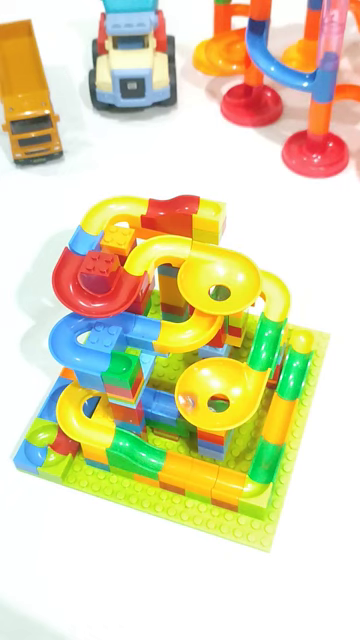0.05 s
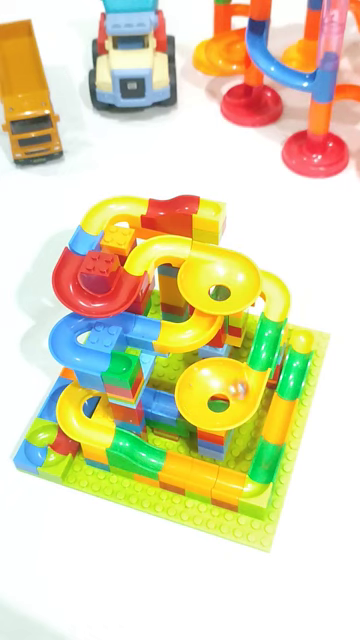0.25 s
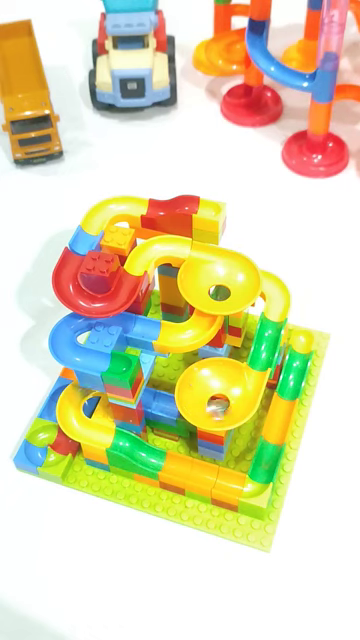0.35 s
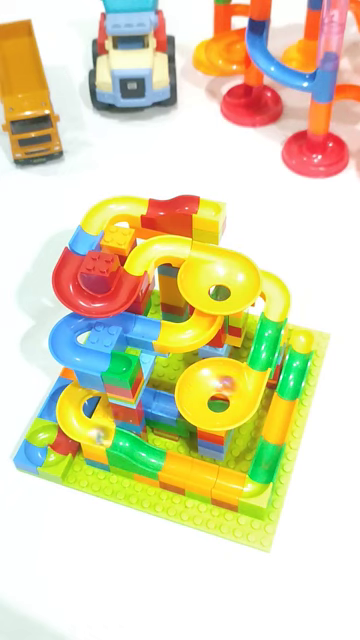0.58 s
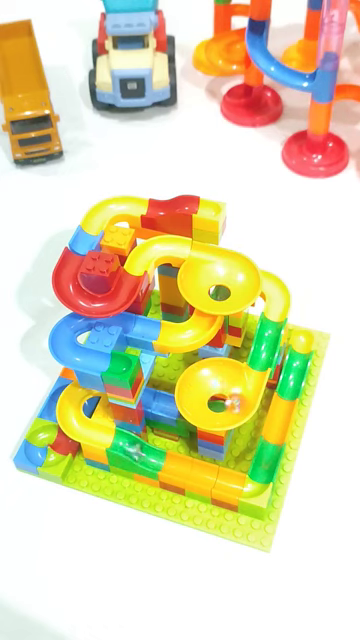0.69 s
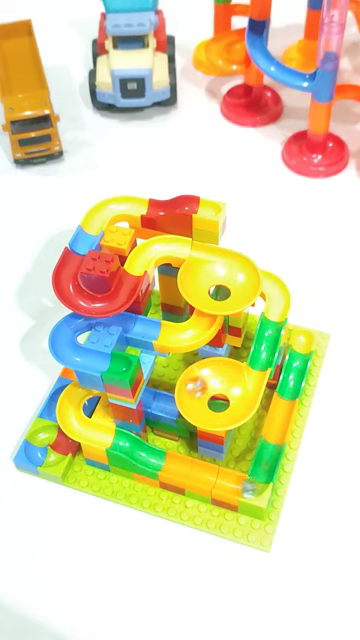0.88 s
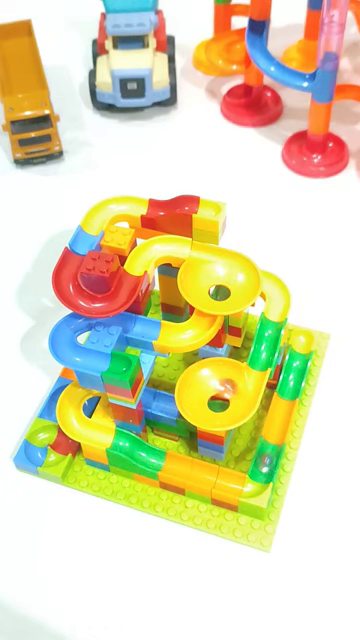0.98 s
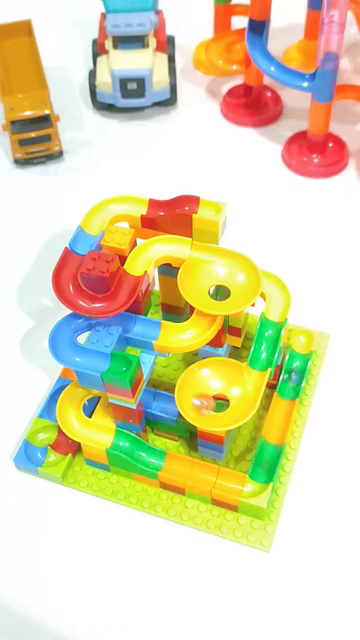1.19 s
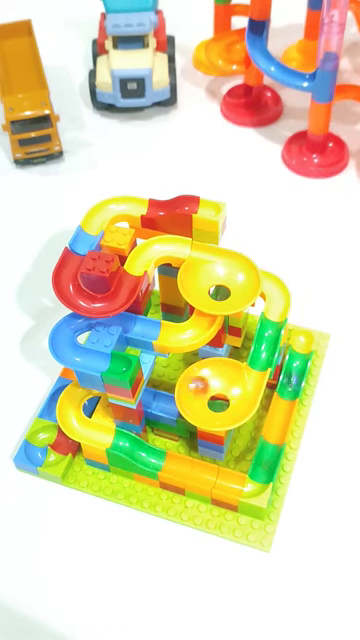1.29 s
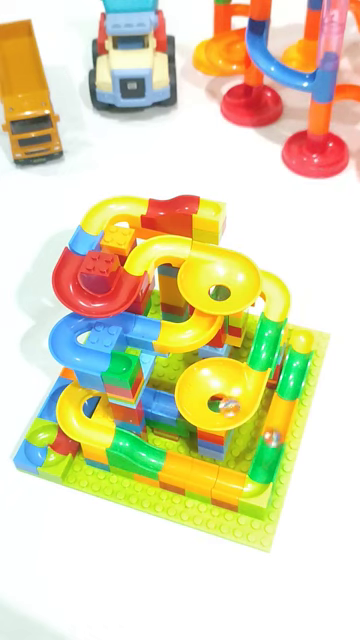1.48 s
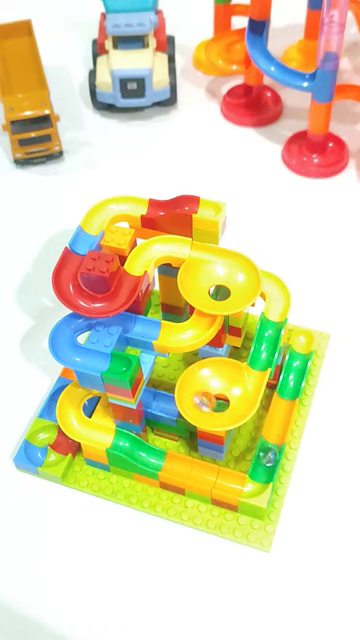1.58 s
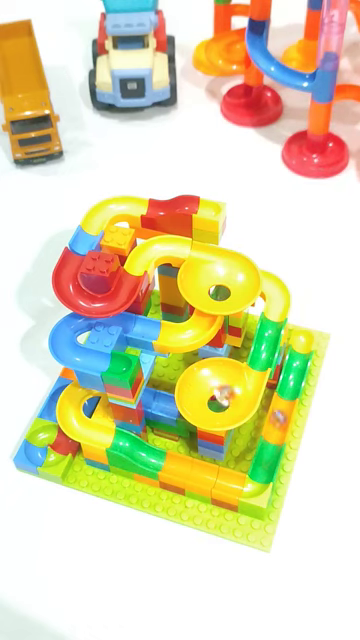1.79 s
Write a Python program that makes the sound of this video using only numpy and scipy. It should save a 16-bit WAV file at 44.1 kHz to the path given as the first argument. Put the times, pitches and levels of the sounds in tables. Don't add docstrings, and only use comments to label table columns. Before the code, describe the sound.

Marbles rattling through a hollow plastic marble run, with hard knocks, glassy clicks and rolling rumble

```python
import sys
import numpy as np
from scipy import signal
from scipy.fft import rfft, irfft
from scipy.io import wavfile

SR = 44100
rng = np.random.default_rng(int(sys.argv[2]) if len(sys.argv) > 2 else 0)


def convert_level_to_amplitude(level_db):
    exponent = np.asarray(level_db, float) / 20
    return 10 ** exponent


def file_out(sig):
    cols = np.atleast_2d(sig).T
    lim = np.clip(cols, -1, 1)
    pcm = np.round(lim * 32767).astype(np.int16)
    wavfile.write(sys.argv[1], SR, pcm)


N = 79380

# frequency in Hz, level in dB, t60 in seconds.
TRACK_MODES = [(866, -0.5, 0.043), (1106, -9.5, 0.14), (1200, 3.5, 0.024), (1509, -10, 0.076),
               (1600, 4.5, 0.017), (1916, -1, 0.013), (2230, -7, 0.087), (2544, 0, 0.061), (2997, 5, 0.018),
               (3130, 9, 0.0072), (3684, -3, 0.067), (4000, 2, 0.011), (4800, -60, 0.09)]


def at_hz(points, hz):
    point_hz, value = np.transpose(points)
    return np.interp(np.log(hz), np.log(point_hz), value)


def rms_one(x):
    return x / np.sqrt(np.mean(x ** 2) + 1e-20)


def pair(alike, size):
    mid, side = rng.standard_normal((2, size))
    alike = np.clip(alike, 0, 1)
    return np.sqrt(1 + alike) * mid + np.sqrt(1 - alike) * side * [[1], [-1]]


def butter(order, hz, kind, x):
    return signal.sosfilt(signal.butter(order, hz, kind, fs=SR, output="sos"), x)


def hum():
    # frequency in Hz, level in dB per Hz.
    hum_spectrum = [(8.8, 8.5), (40, 6), (164, -7.5), (405, -19), (2470, -20), (7070, -35.5), (9190, -29.5),
                    (12300, -83), (16000, -109)]
    hum_db, hum_alike, left_right_db = -60, 2 / 3, -2
    drone_hz, drone_db, drone_ends_s = 159.7, -68, 0.29
    hz = np.maximum(np.fft.rfftfreq(N, 1 / SR), 1)
    t = np.arange(N) / SR
    drone = convert_level_to_amplitude(drone_db - 20 * (t / drone_ends_s) ** 4) * np.sin(2 * np.pi * drone_hz * t)
    spectrum = rfft(pair(hum_alike, N)) * convert_level_to_amplitude(at_hz(hum_spectrum, hz))
    rumble = convert_level_to_amplitude(hum_db) * rms_one(irfft(spectrum, N))
    return (rumble + drone) * convert_level_to_amplitude(left_right_db * np.array([[.5], [-.5]]))


def ring(impulses, hz, t60):
    r, w = convert_level_to_amplitude(-60 / (t60 * SR)), 2 * np.pi * hz / SR
    return signal.lfilter([0, np.sin(w)], [1, -2 * r * np.cos(w), r * r], impulses + 1e-18)


def rolling():
    # time in seconds, level in dB, pitch of the piece under the marble in Hz.
    roll_path = [(0.0, -46, 1720), (0.084, -69.5, 1280), (0.224, -52.5, 1150), (0.264, -52.5, 1750),
                 (0.334, -51, 1170), (0.386, -57, 1660), (0.44, -64, 1720), (0.47, -58, 1210),
                 (0.67, -58.5, 1310), (0.802, -55, 2010), (0.852, -61.5, 1810), (1.022, -47, 2400),
                 (1.056, -51, 1460), (1.132, -58, 2060), (1.182, -52, 1470), (1.418, -66, 1670),
                 (1.658, -59, 1340), (1.8, -71, 1360)]
    grains_per_s, grain_db, near_db_per_oct = 2500, 2.5, 9.5
    grit_db, grit_above_hz, grit_alike = -15, 5000, 0.1
    swell_db, swells_per_s = 6, 42.4

    t = np.arange(N) / SR
    s, db, pitch_hz = np.transpose(roll_path)
    under_hz = np.interp(t, s, pitch_hz)
    sizes = convert_level_to_amplitude(grain_db * np.minimum(rng.exponential(1, N), 4)) * rng.choice([-1, 1], N)
    grains = sizes * (rng.random(N) < grains_per_s / SR)
    body = 0
    for hz, mode_db, t60 in TRACK_MODES:
        dealt = rng.random(N) < .4
        nearness = convert_level_to_amplitude(-near_db_per_oct * abs(np.log2(hz / under_hz)))
        body = body + convert_level_to_amplitude(mode_db) * ring(grains * dealt * nearness, hz, min(0.5 * t60 + 0.0043, .04))
    grit = butter(2, grit_above_hz, "high", grains * pair(grit_alike, N))
    swell = rms_one(butter(2, swells_per_s, "low", rng.standard_normal(N)))
    level = convert_level_to_amplitude(np.interp(t, s, db) - 3.0 + swell_db * np.clip(swell, -2, 1))
    return level * (rms_one(body) + convert_level_to_amplitude(grit_db) * rms_one(grit))


def strike(s, db, modes, rebound_s, draws, chatter_db):
    # frequency in Hz, left minus right in dB.
    left_right = [(60, -1.5), (110, -1.5), (200, -1.5), (380, 0.0), (700, -2), (1290, 5.5), (2380, 0.5),
                  (4400, -17), (8120, 8.5), (15000, -16)]
    lag_start_s, lag_end_s = 7e-5, -0.000018
    contact_s, table_s, table_db, detune = .0004, .0029, -12, .05

    out = np.zeros((2, N))
    t = np.arange(s * SR // 1, min(s * SR // 1 + 3500, N))
    hz, level_db, t60 = np.transpose(modes)[:, :, None]
    count = len(hz)
    hz = hz * (1 + detune * draws[0, :count, None])
    lag_s = lag_start_s + (lag_end_s - lag_start_s) * s * SR / N
    touches = [(0, 0), (table_s, table_db)]
    if rebound_s:
        for k in (1, 2, 3):
            touches.append((rebound_s * (k + .5 * draws[0, -k]) / 3, chatter_db - k))
    for ear, side in enumerate((.5, -.5)):
        mode_db = level_db + side * at_hz(left_right, hz)
        for (late_s, touch_db), draw in zip(touches, draws[1:]):
            age = np.maximum(t / SR - s - late_s - side * lag_s, 0)
            weight = draw[:count, None]
            strength = np.sign(weight) * (.5 + abs(weight))
            rings = convert_level_to_amplitude(mode_db - 60 * age / t60) * np.sin(2 * np.pi * hz * age) * strength
            onset = 1 - np.exp(-age / contact_s)
            out[ear, t.astype(int)] += convert_level_to_amplitude(db + touch_db) * onset * rings.sum(axis=0)
    return out


def clicks():
    # time in seconds, peak in dB, share sent into the room in dB, brightness in dB.
    click_events = [(0.001, -45, 12.5, -30), (0.1723, -44.5, -21, -28), (0.2039, -18, 3, -27.5),
                    (0.2414, -31.5, 7.5, -27), (0.3371, -43, 0, -31), (0.387, -44, 11.5, -26),
                    (0.4772, -46, 1, -17), (0.5072, -59, -5, -25), (0.5231, -46.5, 10, -19.5),
                    (0.5295, -44, -37, -21), (0.5626, -50, -10, -17), (0.5863, -40, 4.5, -14.5),
                    (0.6582, -52, -21, -30), (0.6906, -56, -8, -28), (0.7147, -47.5, 9.5, -14.5),
                    (0.7865, -47, -3, -39), (0.7981, -29.5, 9, -12), (0.8978, -26, 7, -17.5),
                    (0.9893, -30.5, 9, -14), (1.0468, -32, 10, -18), (1.0556, -39.5, 5, -28),
                    (1.0595, -34, -26, -20), (1.0654, -32, -21, -26), (1.0981, -27.5, 7, -14.5),
                    (1.2106, -53, 12.5, -40.5), (1.2813, -37.5, 5, -30), (1.3173, -42, 6.5, -35),
                    (1.422, -49.5, 5, -21), (1.444, -41.5, 5.5, -19.5), (1.507, -43.5, 7, -31.5),
                    (1.5373, -49, 3, -21), (1.6277, -57, -11, -31), (1.692, -57.5, 11.5, -27),
                    (1.7527, -61, -6, -15), (1.7635, -54, -16, -21), (1.788, -54.5, 18, -21.5)]
    # frequency in Hz, level in dB, t60 in seconds.
    glass_modes = [(4654, 8, 0.00074), (5990, 7, 0.0058), (6463, 11, 0.0048), (7910, 11.5, 0.0061),
                   (8960, 7.5, 0.004), (10030, 12, 0.0035), (11860, 17, 0.0032), (12800, -19, 0.0014),
                   (13120, 17, 0.0058), (14400, -3, 0.0011)]
    rebound_s, chatter_db = 0.0026, -6
    crack_s, crack_db, click_room_db = 0.0015, 6.5, -5

    draws = rng.uniform(.2, 1, (40, 6, 20)) * (-1) ** np.arange(20)
    draws[:, 0] = rng.uniform(-.5, .5, (40, 20))
    near, far = 0, 0
    for (s, db, room_db, top_db), draw in zip(click_events, draws):
        modes = np.array([(hz, mode_db + (top_db + 6) * np.log2(hz / 7000), min(t60, 1 / 400))
                          for hz, mode_db, t60 in glass_modes])
        near = near + strike(s, db, modes, rebound_s, draw, chatter_db)
        crack = np.column_stack([modes[:, :2], np.minimum(modes[:, 2], crack_s)])
        sent_db = db + room_db + click_room_db + crack_db
        far = far + strike(s, sent_db, crack, 0, draw, 0).mean(axis=0)
    return near, far


def knocks():
    # time in seconds, peak in dB,
    # pitch of the piece in Hz, share of the whole track in dB.
    plastic_knocks = [(0.016, -45.5, 1330, 0), (0.128, -48.5, 1290, 5.5), (0.174, -42, 1136, 9),
                      (0.2111, -24, 1095, -18), (0.256, -29.5, 1442, -14), (0.284, -41, 1044, -13),
                      (0.329, -28.5, 1072, -23), (0.363, -33.5, 1940, -1.5), (0.398, -31, 1790, -3),
                      (0.872, -42, 1620, -14), (0.896, -31.5, 1920, -31), (1.041, -37.5, 1090, -0.5),
                      (1.064, -43, 1386, -7), (1.096, -34, 1830, -24), (1.208, -42, 1200, 2),
                      (1.2815, -25, 1629, -6.5), (1.306, -47, 1510, -12), (1.3193, -28, 1600, -5),
                      (1.342, -45, 1567, -26), (1.445, -45, 1510, 1.5), (1.461, -44.5, 1200, 5.5),
                      (1.509, -43.5, 1702, 11), (1.57, -43.5, 1547, -2), (1.604, -45, 1236, 1),
                      (1.642, -38.5, 1220, 2), (1.688, -49, 1110, -15),
                      (0.2045, -7, 3284, -15), (0.2107, -43, 3250, -8), (0.2408, -11.5, 2895, -12.5),
                   (0.3292, -23.5, 2790, -8), (0.3626, -30.5, 2486, -6), (0.398, -20.5, 3554, -9.5),
                   (0.521, -38, 2970, -10), (0.7246, -43.5, 2690, 3), (0.788, -37, 2237, -5),
                   (0.8759, -36, 1990, 2), (0.8972, -30, 2390, -15), (0.9466, -31, 3900, -4),
                   (0.988, -41, 2310, -15), (1.0201, -28, 2383, -2), (1.0489, -27, 4890, -6),
                   (1.0955, -32.5, 2670, 3.5), (1.2102, -39.5, 2470, 3.5), (1.2804, -26.5, 3500, -5),
                   (1.3183, -23, 3570, -0.5), (1.3454, -36, 2470, -5), (1.5076, -36.5, 3890, 1),
                   (1.641, -44.5, 2940, 5.5),
                      (0.2144, -23, 3070, -15), (0.224, -25, 3280, -26), (0.4465, -49, 1690, -3),
                  (0.4678, -52, 1186, 2), (0.532, -48, 1387, 4.5), (0.6571, -52, 1093, -1.5),
                  (0.677, -45, 1717, -25), (0.858, -42.5, 1840, 0), (1.247, -39.5, 1510, -3),
                  (1.3228, -23, 3770, -14), (1.744, -66, 1144, 3), (1.7844, -58.5, 1380, 7)]
    piece_cycles, piece_db, rebound_cycles = 30, -2.5, 13
    base_db, near_db_per_oct, damping = -9, 5, .6
    low_chatter_db, high_chatter_db = -4.5, -17

    out, draws = 0, rng.uniform(-1, 1, (60, 6, 20))
    draws[:, 0, 0] = 0
    for (s, db, pitch_hz, track_db), draw in zip(plastic_knocks, draws):
        modes = [(pitch_hz, piece_db, piece_cycles / pitch_hz)]
        for hz, mode_db, t60 in TRACK_MODES:
            far_db = near_db_per_oct * abs(np.log2(hz / pitch_hz))
            modes.append((hz, base_db + track_db + mode_db - far_db, damping * t60))
        chatter_db = low_chatter_db if pitch_hz < 2500 else high_chatter_db
        out = out + strike(s, db, modes, rebound_cycles / pitch_hz, draw, chatter_db)
    return out


def room(x):
    # frequency in Hz, t60 in seconds.
    room_t60 = [(300, 0.11), (1200, 0.37), (3500, 0.2), (9000, 0.37), (14000, 0.25)]
    # frequency in Hz, level in dB.
    room_colour = [(300, -7), (1200, 10), (3500, 4), (9000, 2.5), (15000, 6)]
    rise_s, low_alike = .004, .3

    t = np.arange(SR // 2) / SR
    tail = 0
    for low_hz in 150 * 2. ** np.arange(7):
        centre_hz = low_hz * np.sqrt(2)
        noise = pair(low_alike * np.log2(9600 / low_hz) / 2, len(t))
        band = butter(2, [low_hz, 2 * low_hz], "band", noise)
        tail = tail + band * convert_level_to_amplitude(at_hz(room_colour, centre_hz) - 60 * t / at_hz(room_t60, centre_hz))
    tail = tail * (1 - np.exp(-(t / rise_s) ** 2))
    return signal.fftconvolve(x[None], tail / np.sqrt(np.sum(tail ** 2) / 2), axes=1)[:, :N]


def scene():
    room_db, thin_below_hz, top_hz = -6, 520, 14760
    blows, roll = knocks(), rolling()
    glass, glass_far = clicks()
    toy = blows + roll
    toy = toy + room(convert_level_to_amplitude(room_db) * blows.mean(axis=0))
    toy = toy + room(convert_level_to_amplitude(room_db) * roll[0])
    toy = toy + room(glass_far)
    dull = signal.cheby2(16, 60, top_hz, fs=SR, output="sos")
    body = signal.sosfilt(dull, butter(4, thin_below_hz, "high", toy) + hum())
    return body + butter(4, thin_below_hz, "high", glass)


def top_cut(x):
    return signal.sosfilt(signal.butter(12, 16510, fs=SR, output="sos"), x)


def record(dry):
    mix = butter(12, 14800, "low", dry)
    return top_cut(mix)


dry = scene()
out = record(dry)
file_out(out)
```